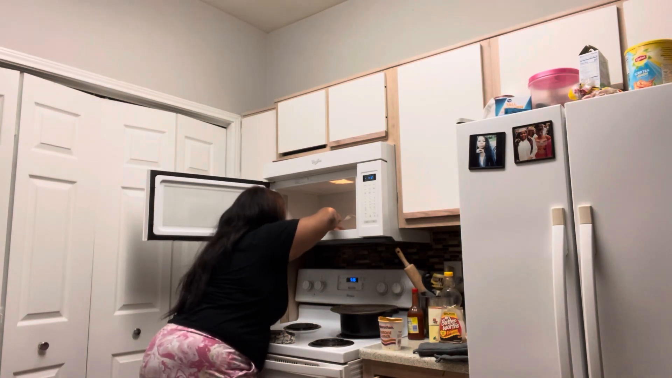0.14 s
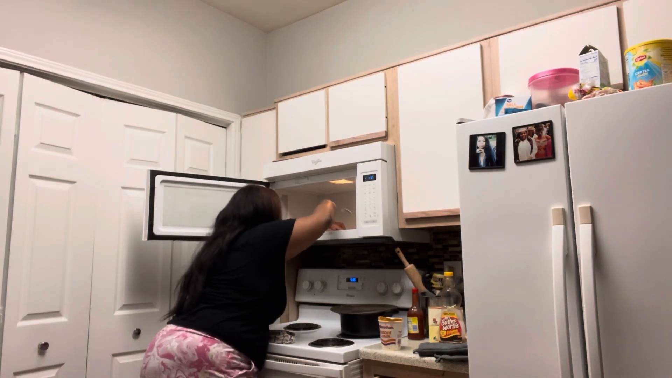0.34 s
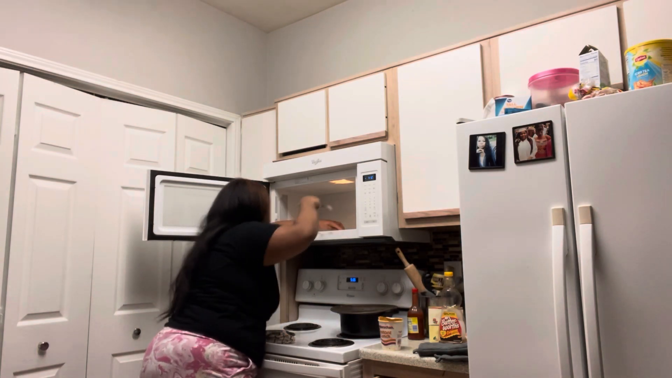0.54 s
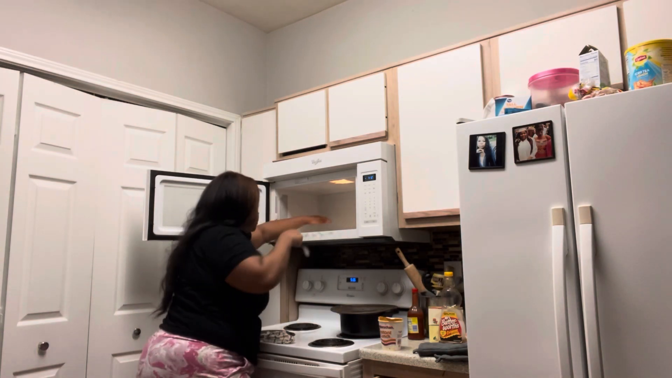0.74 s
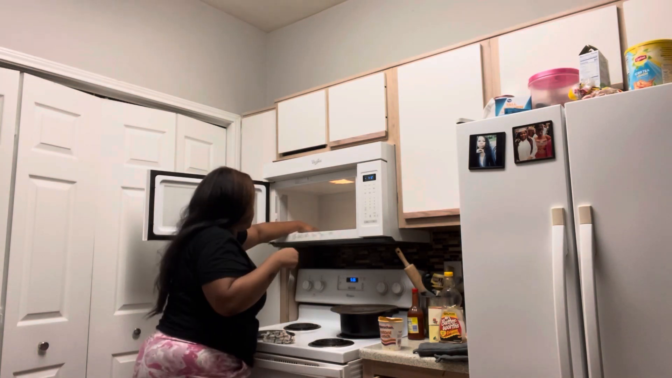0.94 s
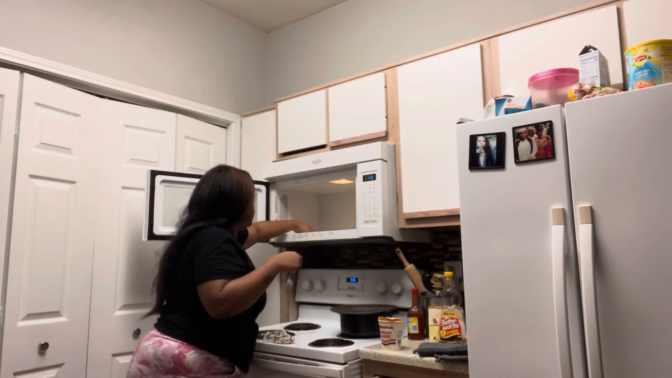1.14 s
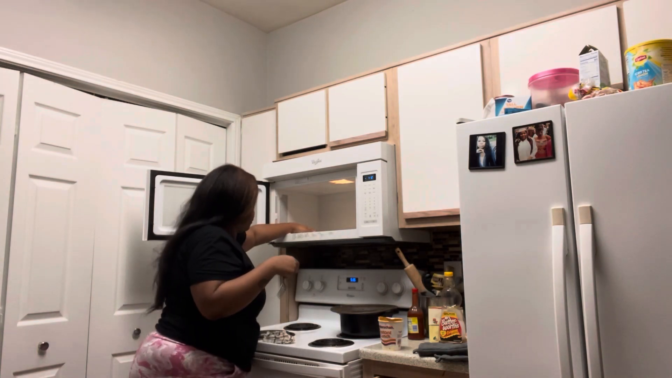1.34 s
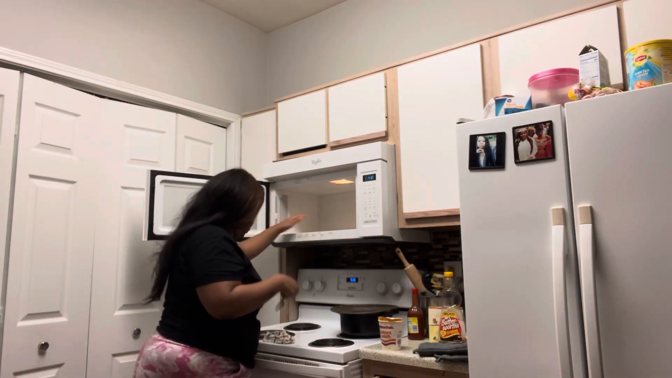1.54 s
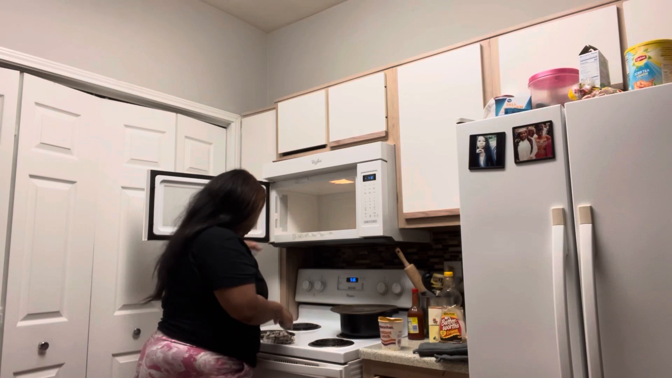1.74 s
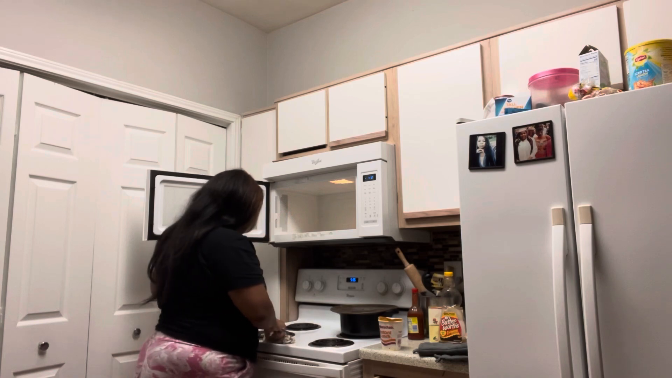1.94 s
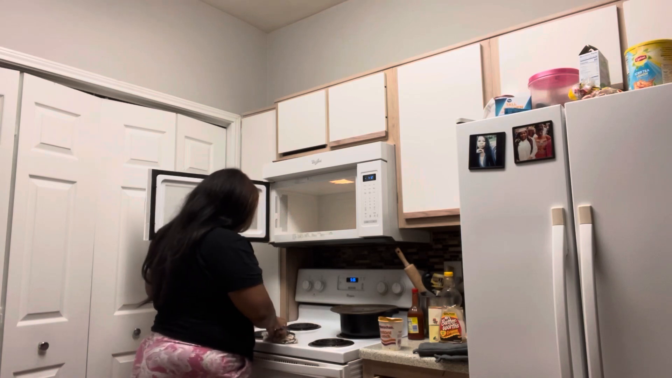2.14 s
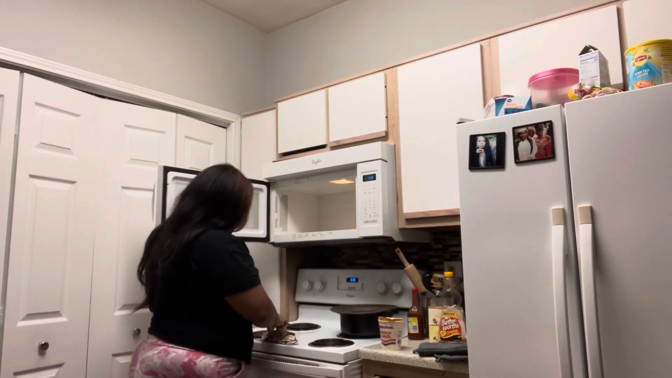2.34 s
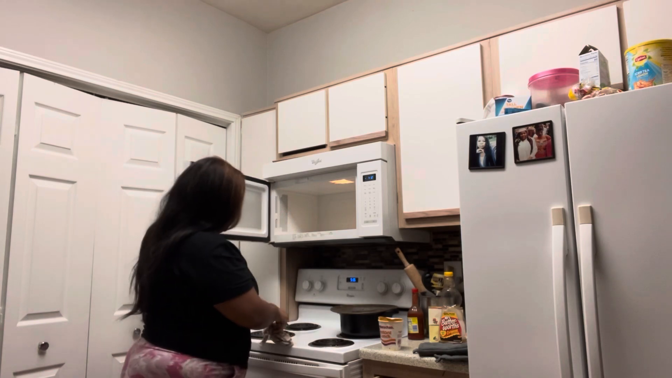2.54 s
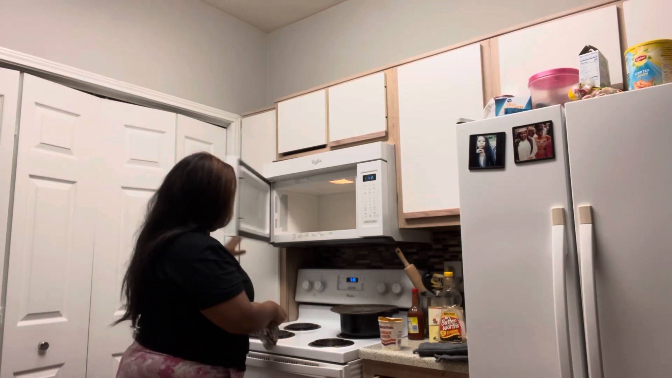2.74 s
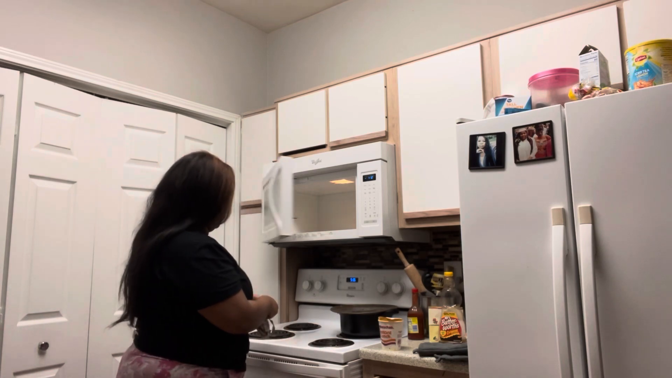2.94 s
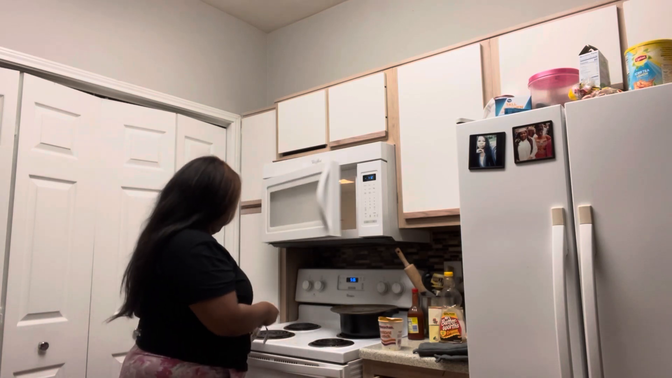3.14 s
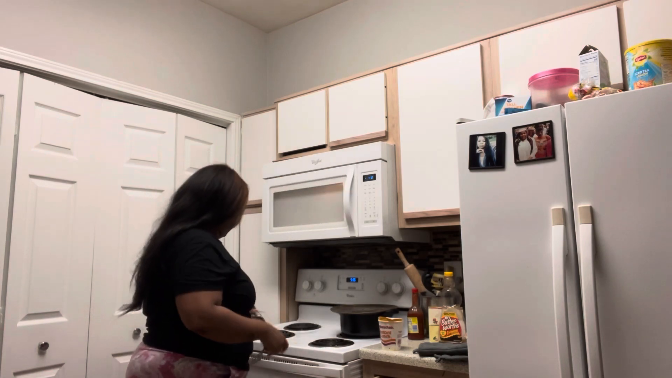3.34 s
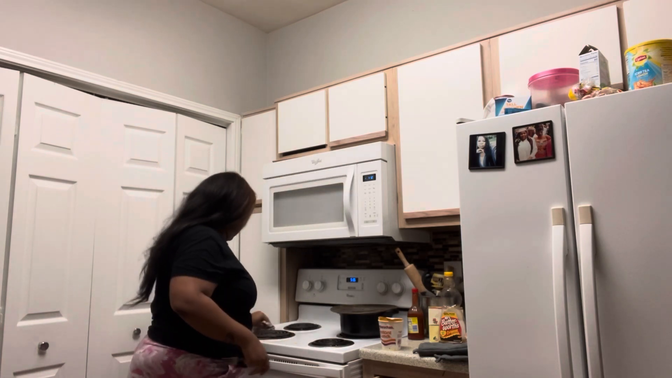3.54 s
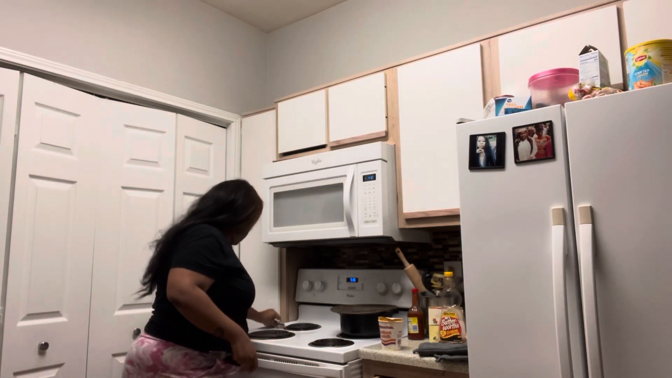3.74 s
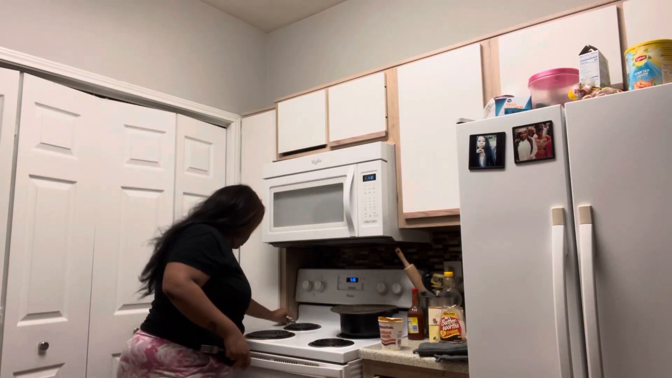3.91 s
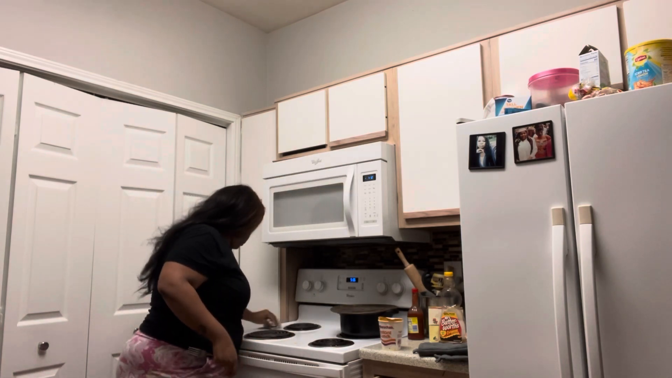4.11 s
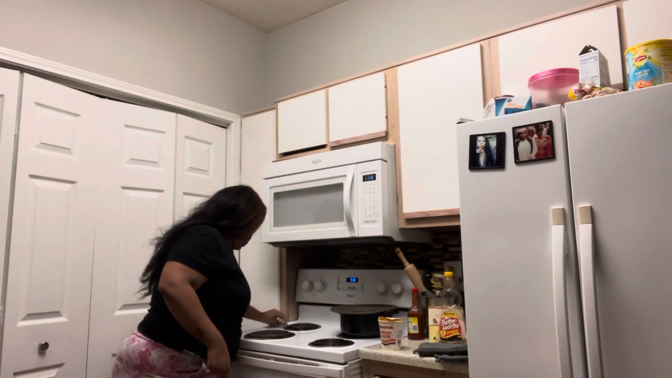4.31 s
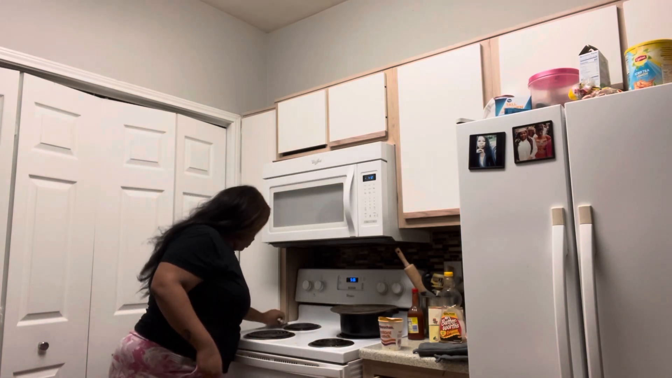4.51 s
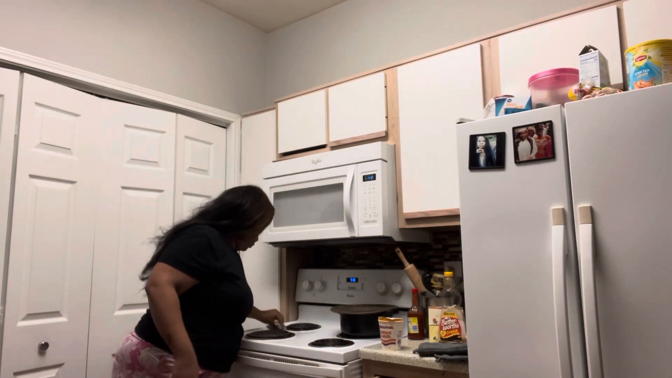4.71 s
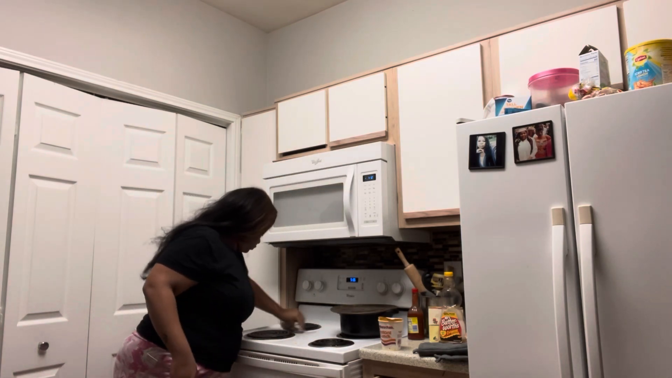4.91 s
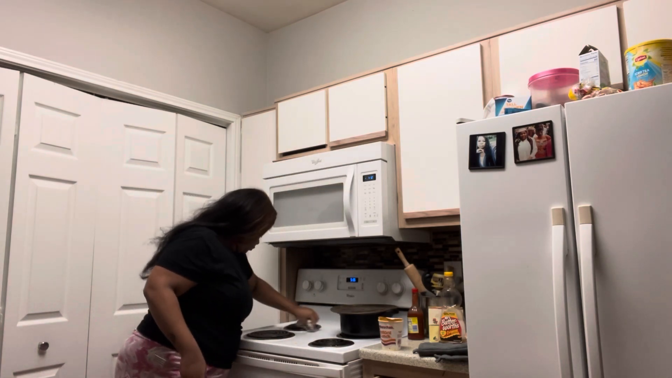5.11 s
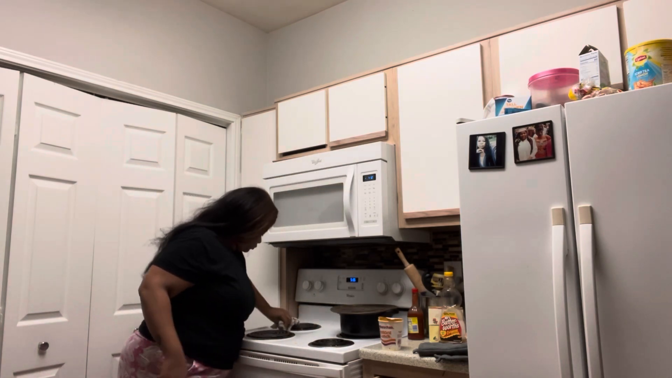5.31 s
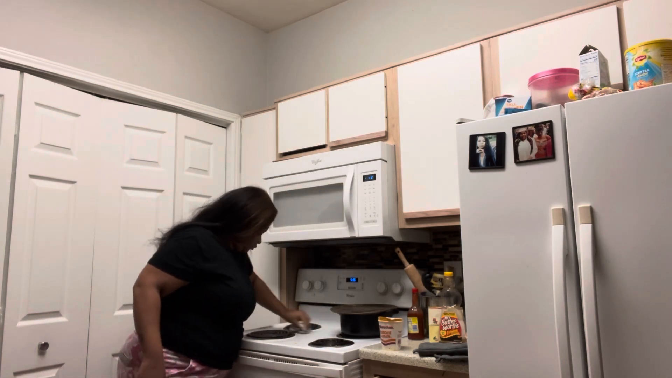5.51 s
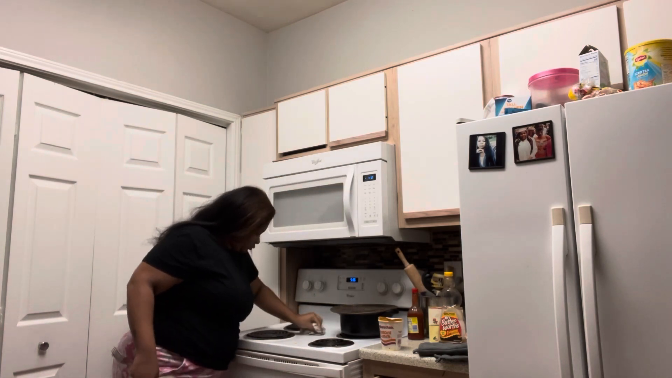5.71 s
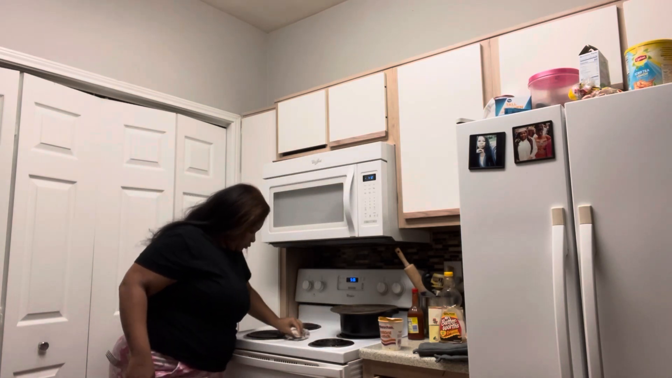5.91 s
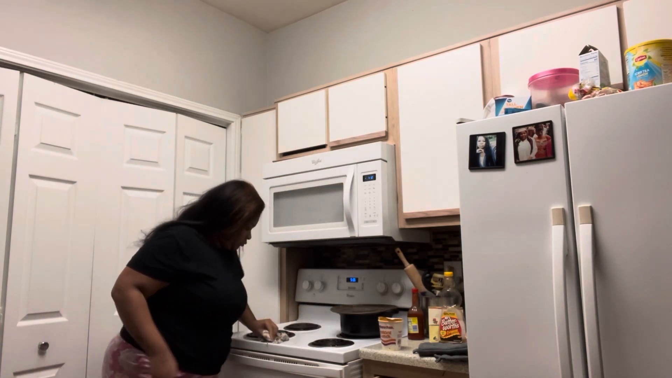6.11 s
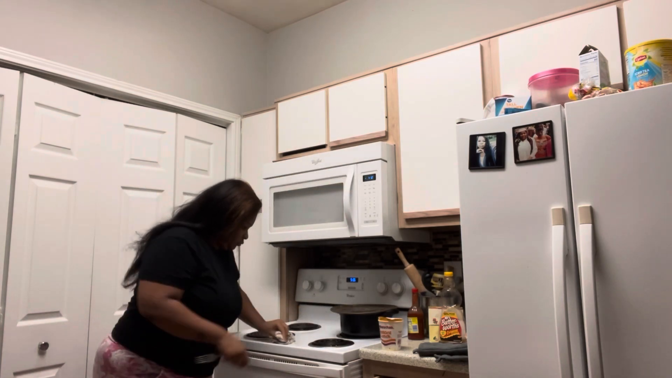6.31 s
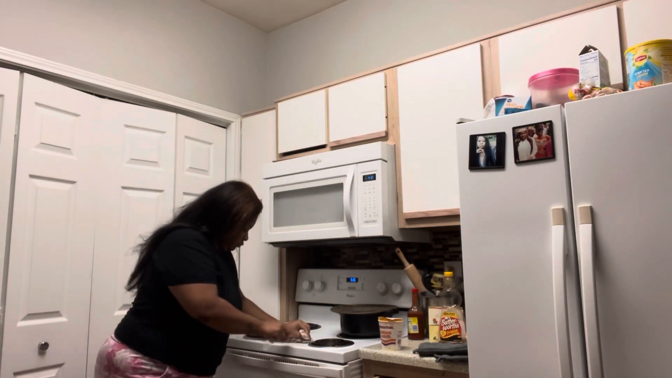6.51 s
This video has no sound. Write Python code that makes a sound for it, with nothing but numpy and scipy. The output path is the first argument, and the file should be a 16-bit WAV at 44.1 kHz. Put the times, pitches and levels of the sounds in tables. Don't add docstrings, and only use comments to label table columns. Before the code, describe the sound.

Low fridge and ventilation rumble under kitchen cleaning. First come irregular hollow thumps on thin sheet metal, light glass rings and tiny nail ticks. Near the middle one loud microwave door slam cracks, thuds and chatters, with a short room echo. Then fibres hiss on enamel in dry strokes, with a few muffled knocks. The phone microphone is across the room, its two channels unlike.

```python
import sys
import numpy as np
from scipy import signal
from scipy.fft import rfft, irfft, next_fast_len
from scipy.io import wavfile

SR = 44100
rng = np.random.default_rng(int(sys.argv[2]) if len(sys.argv) > 2 else 0)


def volts(x):
    e = np.asarray(x, float) / 20
    return 10 ** e


def persist_wave(psi):
    counts = np.round(np.clip(psi, -1, 1) * 32767).astype(np.int16)
    wavfile.write(sys.argv[1], SR, np.atleast_2d(counts).T)


N = 293706


def rms_one(x):
    return x / np.sqrt(np.mean(x ** 2) + 1e-20)


def at_hz(points, hz, axis=1):
    points = np.array(points)
    return np.interp(np.log(hz + 1), np.log(points[:, 0]), points[:, axis])


def drift(rate):
    r = np.exp(-80 * np.pi * rate / SR)
    white = rng.standard_normal(N // 40 + 2002)
    slow = signal.lfilter([1], [1, -2 * r, r * r], white)[2000:]
    return np.interp(np.arange(N) / 40, np.arange(len(slow)), rms_one(slow))


def band(x, low_hz, high_hz):
    sos = signal.butter(2, [low_hz, min(high_hz, 0.45 * SR)], "band", fs=SR, output="sos")
    return signal.sosfilt(sos, x + 1e-18)


def clicks(times, db):
    out = np.zeros(N)
    out[(np.asarray(times) * SR).astype(int)] = volts(db)
    return out


def struck(times, db, modes, damping, contact_s):
    out = np.zeros(N)
    luck = rng.standard_normal((len(times), len(modes)))
    scuff = rng.standard_normal(N)
    fade = np.exp(-1 / (contact_s * SR))
    for k, (hz, level_db, t60) in enumerate(modes):
        r = volts(-60 / (damping * t60 * SR))
        w = 2 * np.pi * hz / SR
        hits = clicks(times, db + level_db + 2.7 * luck[:, k])
        blow = signal.lfilter([np.sqrt(1 - fade ** 2)], [1, -fade], hits)
        out += signal.lfilter([0, np.sin(w)], [1, -2 * r * np.cos(w), r * r], blow * scuff + 1e-18)
    return out


def bursts(times, db, t60, rise_s):
    dying = signal.lfilter([1], [1, -volts(-60 / (t60 * SR))], clicks(times, db) + 1e-18)
    rise = np.exp(-1 / (rise_s * SR))
    return rng.standard_normal(N) * signal.lfilter([1 - rise], [1, -rise], dying)


def tones(rows, swell_cycles):
    out = np.zeros(N)
    for s, hz, db, t60 in rows:
        i = int(s * SR)
        t = np.arange(int(min(t60, 1) * SR)) / SR
        swell = (1 - np.exp(-t * hz / swell_cycles)) ** 2
        out[i:i + len(t)] += np.sin(2 * np.pi * hz * t) * swell * volts(db - 60 * t / t60)
    return out


EDGES = 25 * 2 ** np.arange(0, 9.4, 1 / 3)


def banded_noise(spectrum, patchy_db, rate):
    out, white = 0, rng.standard_normal((2, 2, N))
    for k, (low, high) in enumerate(zip(EDGES, EDGES[1:])):
        if high < spectrum[0][0] / 2:
            continue
        level_db = at_hz(spectrum, np.sqrt(low * high))
        out = out + volts(level_db + patchy_db * drift(rate)) * band(white[k % 2], low, high)
    return rms_one(out)


# (frequency [Hz], level [dB per Hz])
RUMBLE = [(25, -4), (60, -3), (110, -0.5), (180, 2.5), (260, 1), (350, -10.5), (550, -13.5), (900, -22),
          (1400, -31.5), (2000, -39), (3500, -48.5), (7000, -57.5), (15000, -60)]


def rumble():
    return volts(-38 + 0.2 * drift(2.4)) * banded_noise(RUMBLE, patchy_db=1.5, rate=8)


# (time [s], frequency [Hz], level [dB], t60 [s])
THUMPS = [(0.0, 409.6, -41, 0.76), (0.0, 127, -20, 0.13), (0.089, 115, -27.5, 0.52),
          (0.30, 254.6, -39.5, 1), (0.575, 489, -37.5, 0.19), (0.65, 398, -43, 0.21),
          (0.965, 655, -42, 0.35), (0.848, 419.4, -39, 0.35), (0.868, 116, -22, 0.062),
          (0.962, 259.4, -28, 0.51), (0.966, 103.2, -24, 0.29), (1.386, 158, -36, 0.46),
          (1.39, 91.5, -31.5, 0.44), (3.303, 196, -11, 0.19), (3.306, 252, -10, 0.15),
          (3.306, 341, -16, 0.1), (3.308, 417, -15, 0.15), (3.318, 81.6, -4, 0.11),
          (3.318, 63.5, -8, 0.072), (3.36, 378.6, -27, 0.6), (3.38, 334.8, -29.5, 0.56),
          (3.36, 95.7, -24.5, 0.61), (3.40, 101.5, -24.5, 0.55), (3.37, 66.4, -28, 0.54)]


def thumps():
    return tones(THUMPS, swell_cycles=0.19)


# (time [s], box level [dB], crack level [dB], crack centre [Hz])
KNOCKS = [(0.003, -38.5, -29, 1290), (0.02, -54, -36.5, 2700), (0.049, -56, -41.5, 1130),
          (0.163, -50.5, -56, 1010), (0.345, -60, -53, 1200), (0.359, -47.5, -36, 600),
          (0.385, -47.5, -37, 700), (0.573, -59, -36, 900), (0.601, -55, -45, 596), (0.63, -55, -32.5, 620),
          (0.845, -54, -43, 570), (0.918, -58, -40, 715), (0.949, -30.5, -25.5, 1270),
          (0.955, -46.5, -37, 1940), (0.963, -40.5, -21.5, 690), (0.984, -58, -37, 1100),
          (1.135, -46.5, -42, 900), (1.167, -55.5, -53, 900), (1.372, -45, -39, 1320),
          (1.409, -51.5, -44, 680), (4.838, -47.5, -36, 646), (4.865, -54, -40, 640), (4.91, -65, -39, 650),
          (5.435, -68, -45, 750), (5.459, -46, -34.5, 1030), (5.47, -63.5, -39.5, 2200),
          (5.51, -49.5, -47, 900)]
# (frequency [Hz], level [dB], t60 [s])
CAVITY = [(429.4, -5.5, 0.43), (510, -17, 0.06), (700, -3.5, 0.11), (736, 4, 0.17), (980, -0.5, 0.14),
          (1140, -5.5, 0.16), (1200, -20, 0.061), (1420, -3.5, 0.1), (1720, -37, 0.06), (2200, -29, 0.17)]


def blows():
    s, box_db, crack_db, crack_hz = np.transpose(KNOCKS)
    out = band(struck(s, box_db, CAVITY, damping=0.17, contact_s=0.006), 250, 2800)
    for at, db, hz in zip(s, crack_db, crack_hz):
        i = int(at * SR)
        t60 = 0.058 * (hz / 1000) ** -0.36
        t = np.arange(min(SR // 4, N - i)) / SR
        shape = (1 - np.exp(-t / 0.0063)) * volts(db + 5.0 - 60 * t / t60)
        crack = band(shape * rng.standard_normal(len(t)), hz / 2.2, hz * 1.8)
        out[i:i + len(t)] += band(crack, hz / 8.5, hz * 1.9)
    return out


# (time [s], level [dB], upper modes [dB], rim modes [dB])
CLINKS = [
    (0.004, -42.5, -17, 3),
    (0.355, -50, -15.5, -3.5),
    (0.385, -54, -13.5, -1),
    (0.949, -45.5, -20, 6.5),
    (0.975, -59, -27, 13),
    (1.134, -53, -21, -1.5),
    (1.375, -64, -16, 2),
]
# (frequency [Hz], level [dB], t60 [s])
TRAY = [(1240, 5, 0.18), (1304, 4.5, 0.12), (2196, -16, 0.14), (2200, -13, 0.14)]
# (frequency [Hz], level [dB], t60 [s])
TRAY_TOP = [(4597, -11, 0.13), (5150, 2, 0.17), (5300, -8, 0.2), (7000, -10, .13), (7600, -25, .1),
            (8650, -20, .1)]
# (frequency [Hz], level [dB], t60 [s])
TRAY_RIM = [(3300, -16, .18), (3560, -17, .15), (3630, -14, .22), (3700, -17, .15)]


def tray():
    rows = []
    for s, db, top_db, rim_db in CLINKS:
        for family_db, modes in [(0, TRAY), (top_db, TRAY_TOP), (rim_db, TRAY_RIM)]:
            rows += [(s, hz, db + family_db + mode_db, t60) for hz, mode_db, t60 in modes]
    buzz = 0.5 + 0.7 * drift(45)
    return buzz * tones(rows, swell_cycles=9.9)


# (time [s], level [dB])
SHAKES = [
    (-0.06, -33),
    (3.3016, -15),
]


def rattle():
    top, chatter, boom = np.zeros((3, N))
    for s, db in SHAKES:
        i = max(int(s * SR), 0)
        t = np.arange(i, i + SR) / SR - s
        rise = 1 - np.exp(-np.maximum(t, 0) / 0.0038)
        buzz_db = -29.5 - 27.5 * t - 158 * np.maximum(t - 0.32, 0)
        settling = volts(-298 * t)
        chatter[i:i + SR] = rise * volts(db) * (settling + volts(buzz_db))
        top[i:i + SR] = rise * volts(db - 22 - 130 * t)
        dull_db = 15.5 - 9 * np.exp(-t / 0.045)
        boom[i:i + SR] = chatter[i:i + SR] * volts(dull_db)
    grains = rng.standard_normal((2, 2, N)) * volts(2.2 * drift(60))
    bright = rms_one(band(band(grains[0], 1500, 8000), 500, 11000))
    fine = rms_one(band(grains[0], 9500, 13200))
    dull = rms_one(band(grains[1], 170, 1500))
    return chatter * bright + top * fine + boom * dull


# (time of full
# contact [s], fine top level [dB], rise [s], hold [s], pressure [dB])
STROKES = [(.21, -99, .2, .01, 10), (0.365, -79, .04, .01, 2), (0.454, -76, .06, .01, -2),
           (0.667, -66, 0.021, .005, 9), (0.864, -72.5, 0.022, 0.095, 14.5),
           (1.15, -86, .2, 0.0076, 12), (1.79, -82, 0.51, .01, 0), (1.994, -79.5, 0.045, 0.15, 7),
           (2.31, -81.5, 0.43, 0.065, -2), (2.715, -69.5, .1, .005, -10), (2.783, -64.5, .02, .005, 4),
           (3.067, -80, 0.083, .04, 11), (3.246, -82, 0.18, 0.068, 19),
           (3.816, -68.5, 0.32, .01, 6), (3.977, -69.5, 0.1, .005, -2),
                 (4.042, -62, 0.066, 0.048, 5.5), (4.333, -66, 0.095, .02, -2.5),
                 (4.525, -67, 0.39, 0.052, 3.5), (4.69, -67.5, 0.11, .005, 8), (4.97, -58, 0.32, .005, 3),
                 (5.174, -56, .07, 0.026, 6.5), (5.464, -60.5, 0.1, 0.038, 7.5), (5.74, -71, 0.26, .31, 5),
                 (6.264, -63.5, 0.051, .005, 3), (6.34, -72, 0.47, 0.18, -8), (6.65, -72.5, 0.23, .05, 7.5)]


def strokes():
    lift_db_per_s, rest_db = 115.5, -99
    t = np.arange(0, N, 40) / SR
    s, db, rise_s, hold_s, press_db = np.transpose(STROKES)[:, :, None]
    approach_db = 20 * np.maximum(s - t, 0) / rise_s
    lift_db = lift_db_per_s * np.maximum(t - s - hold_s, 0)
    each_db = db - approach_db - lift_db
    top_db = np.maximum(each_db.max(axis=0), rest_db)
    body_db = np.maximum((each_db + press_db).max(axis=0), rest_db)
    return [np.interp(np.arange(N) / SR, t, curve) for curve in (top_db, body_db)]


# (frequency [Hz], level [dB per Hz])
CLOTH = [(900, -13.5), (2000, -5.5), (4000, -0.5), (7000, -4), (10000, -4.5), (13000, -12), (15500, -14.5)]


def cloth():
    top_db, body_db = strokes()
    grain = volts(1.7 * drift(80))
    hiss_db = -0.5 - 0.21 * (top_db + 61)
    hiss = volts(hiss_db) * banded_noise(CLOTH, patchy_db=1.1, rate=14)
    swish = rms_one(band(rng.standard_normal((2, N)), 470, 1800))
    top = rms_one(band(rng.standard_normal((2, N)), 6000, 21000))
    return volts(top_db + 2.0) * grain * (top + hiss) + volts(body_db - 0.5) * swish


# (time [s], peak level [dB], centre [Hz])
TICKS = [
    (0.4444, -60, 10600),
    (0.6614, -51.5, 10700),
    (0.8769, -57, 6140),
    (2.7751, -51.5, 11260),
    (2.839, -56, 10860),
    (4.672, -58, 10500),
    (6.2625, -50.5, 10140),
]


def ticks():
    out = 0
    for s, db, hz in TICKS:
        snap = bursts([s], db - 0.5, t60=0.014, rise_s=0.001)
        out = out + band(snap, hz / 2.2, hz * 1.7)
    return out


# (time [s], level [dB])
LATCH = [
    (3.2876, -18),
    (3.2925, -19),
    (3.296, -17.5),
]
# (frequency [Hz], level [dB], t60 [s])
HOOK = [(980, 3.5, 0.01), (1420, 0, 0.013), (2020, 1.5, 0.012), (2620, -1.5, 0.013), (3580, -8.5, 0.015)]
# (time [s], peak level [dB], panel level [dB re peak], crack level [dB re peak])
SLAM = [
    (3.2885, -15.5, -23, -5.5),
    (3.302, -10, -6, 3),
    (3.305, -3, -2, -4.5),
    (3.311, -19.5, -2, -18.5),
    (3.317, -10.5, 0, -26),
    (3.332, -18, -9, -13.5),
]
# (frequency [Hz], level [dB], t60 [s])
DOOR = [(530, -1, .25), (570, -7.5, 0.25), (656, 0.5, 0.46), (744, -2.5, 0.29), (900, -9, 0.9),
        (1008, -9, 0.1), (1140, -16, 0.24), (1320, -16.5, .3), (1417, -8, .3), (1670, -3.5, 0.13),
        (1970, -6.5, .3), (2240, -15, 0.13), (2525, -14.5, .26), (3630, -19, .1)]


def slam():
    s, peak_db, panel_db, crack_db = np.transpose(SLAM)
    crack = bursts(s, peak_db + crack_db, t60=0.033, rise_s=0.0006)
    crack = band(crack, 600, 8300) + volts(-2.0) * band(crack, 5800, 16000)
    hook = struck(*np.transpose(LATCH), HOOK, damping=0.92, contact_s=0.0011)
    panels = struck(s, peak_db + panel_db - 6.5, DOOR, damping=0.16, contact_s=0.0016)
    return hook + crack + panels


# (frequency [Hz], t60 [s])
ROOM = [(60, 0.52), (250, 0.94), (1000, 0.55), (4000, .6), (8000, 0.42), (14000, 0.13)]


def kitchen(x, wet_db):
    t = np.arange(SR) / SR
    white, tail = rng.standard_normal((2, 2, SR)), 0
    for k, (low, high) in enumerate(zip(EDGES, EDGES[1:])):
        decay = volts(-60 * t / at_hz(ROOM, np.sqrt(low * high)))
        tail = tail + band(white[k % 2], low, high) * decay
    tail = tail * (1 - np.exp(-t / 0.0013))
    tail = tail / np.sqrt(np.sum(tail ** 2, axis=1, keepdims=True))
    return x + volts(wet_db) * signal.fftconvolve(x[None], tail, axes=1)[:, :N]


def scene():
    near = volts(1.5) * blows() + volts(4.5) * ticks() + volts(-5) * slam()
    low = thumps() + volts(5) * tray()
    in_room = kitchen(near, wet_db=1.5) + kitchen(low, wet_db=-7.5)
    return in_room + volts(-1.0) * rattle() + cloth() + rumble()


def roll_off(x):
    return signal.sosfilt(signal.butter(12, 15910, fs=SR, output="sos"), x)


# (frequency [Hz], level [dB], phase [rad], likeness [0-1])
PORTS = [(60, -14.5, 3.1, .92), (200, -11, 1.9, .8), (400, -7, 1.1, .35), (600, -4.5, 2.5, .45),
         (1150, -6.5, 1.4, .88), (1750, -15, .4, .3), (2100, -12, -2.3, .6), (2750, -14, -2.7, .4),
         (3100, -15, -5.3, .45), (3900, -20, -6.2, .4), (4350, -16, -9.2, .6), (5100, -20, -7.5, .4),
         (6500, -8, -5.2, .62), (8300, 0, -3.4, .8)]
# (low edge [Hz], high edge [Hz], sign [+1 or -1])
JOINED = [(8300, 9650, -1), (11000, 12300, 1), (13700, 14900, -1), (14900, 16000, 1)]


def record(dry):
    size = next_fast_len(N + 4096)
    hz = np.fft.rfftfreq(size, 1 / SR)
    dry = signal.sosfilt(signal.butter(2, 42, "high", fs=SR, output="sos"), dry)
    own, right = rfft(np.tanh(dry / 0.95) * 1.01, size)
    alike = at_hz(PORTS, hz, axis=3)
    lag_s = -1.9e-4
    turn = at_hz(PORTS, hz, axis=2) - 2 * np.pi * lag_s * np.maximum(hz - PORTS[-1][0], 0)
    shared = alike * np.exp(1j * turn) * right
    left = volts(at_hz(PORTS, hz)) * (shared + np.sqrt(1 - alike ** 2) * own)
    for low, high, sign in JOINED:
        inside = 0.5 * (np.tanh((hz - low) / 70) - np.tanh((hz - high) / 70))
        left = (1 - inside) * left + inside * sign * right
    top = 1 / np.sqrt(1 + (hz / 14300) ** 80) + volts(-38) * (hz > 14900) * (hz < 15900)
    mix = irfft(np.stack([left, right]) * top, size)[:, :N]
    return roll_off(mix)


dry = scene()
out = record(dry)
persist_wave(out)
```